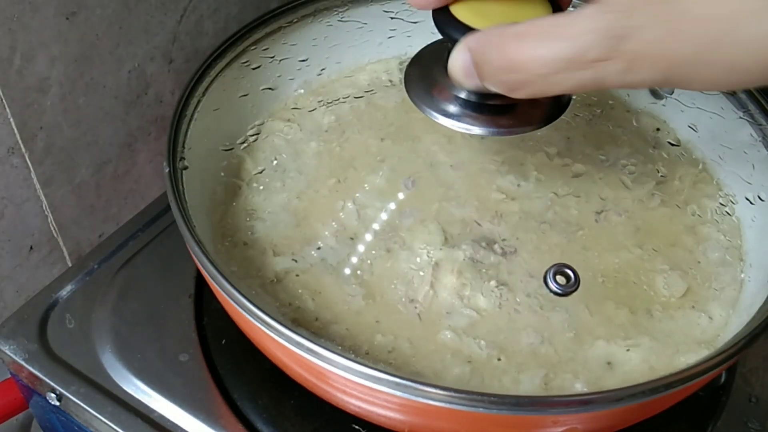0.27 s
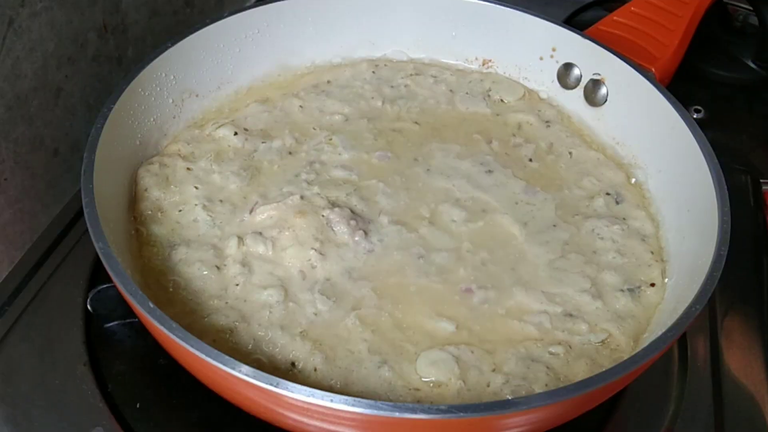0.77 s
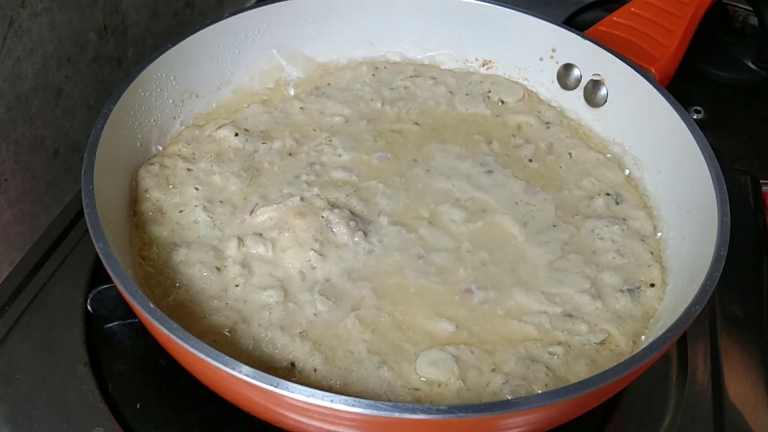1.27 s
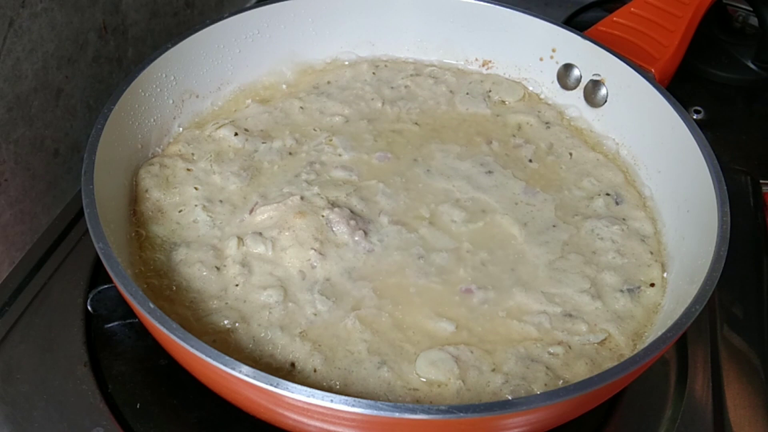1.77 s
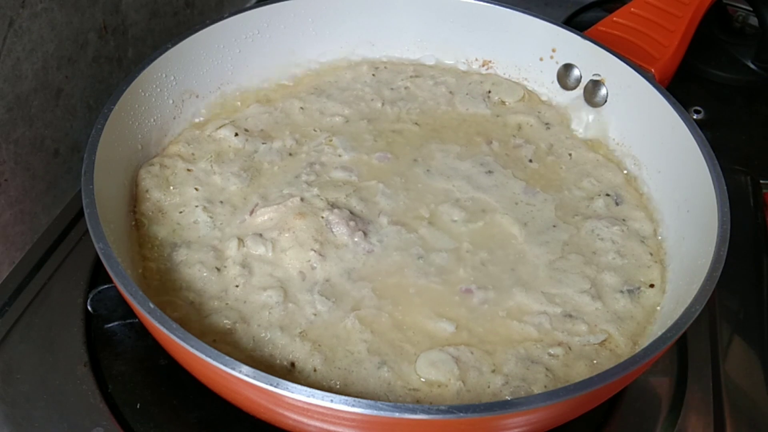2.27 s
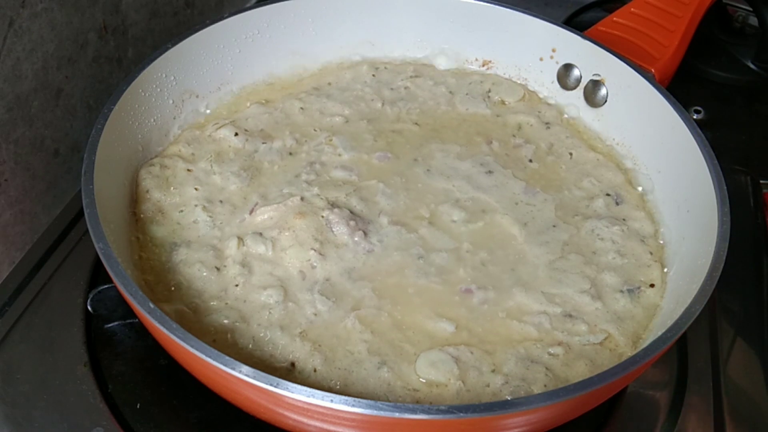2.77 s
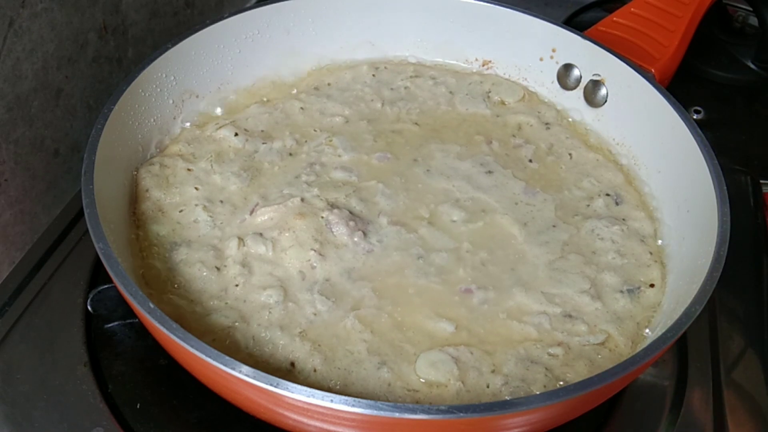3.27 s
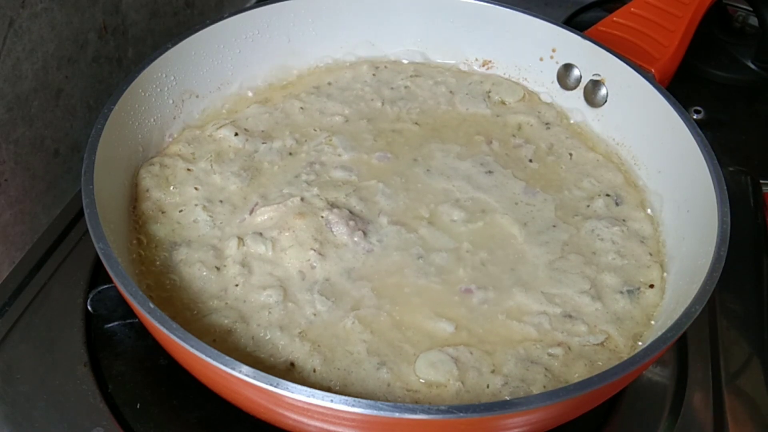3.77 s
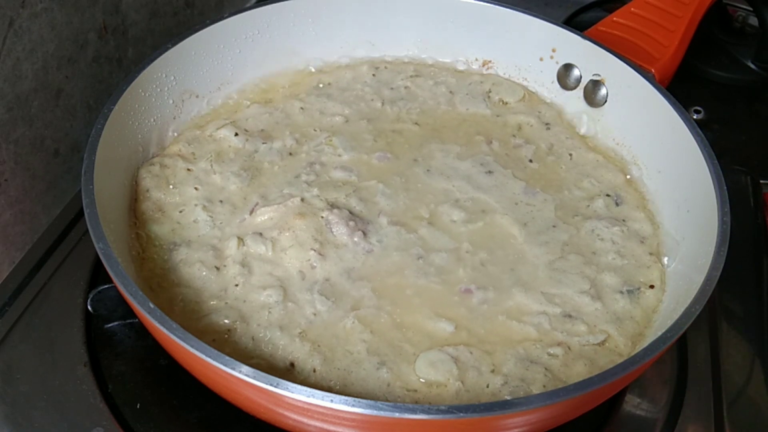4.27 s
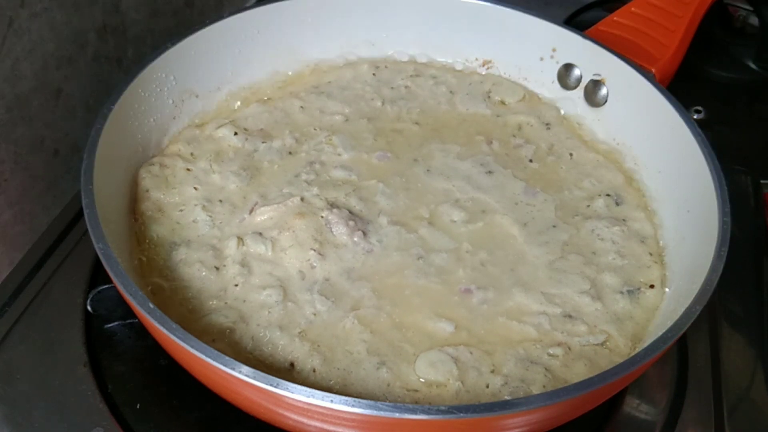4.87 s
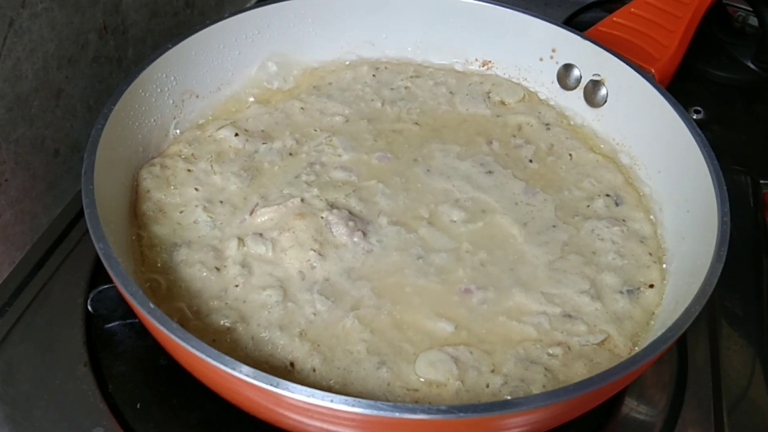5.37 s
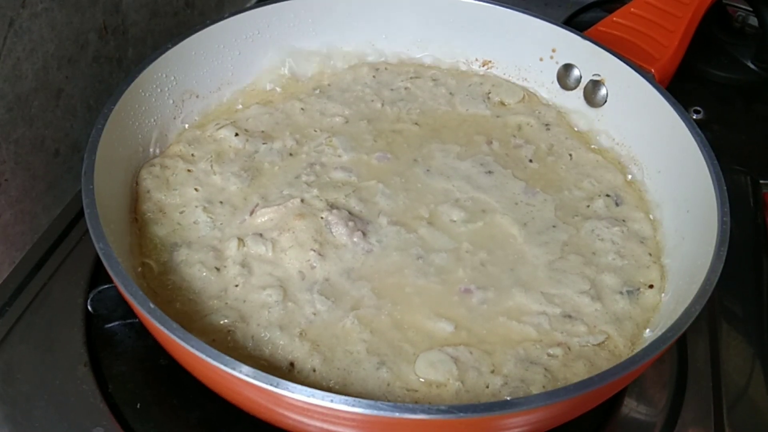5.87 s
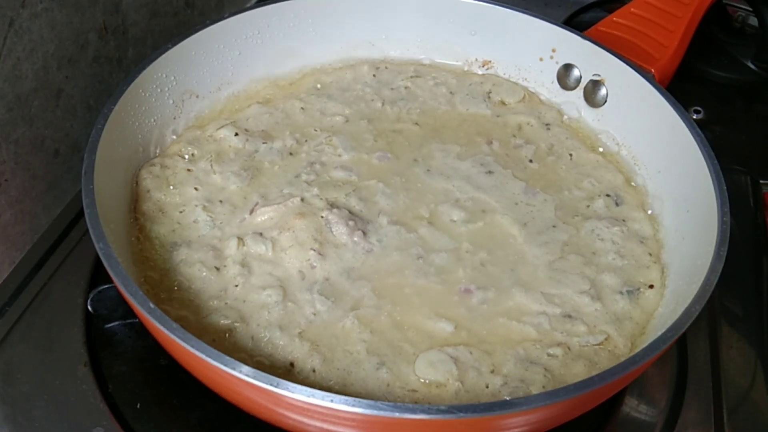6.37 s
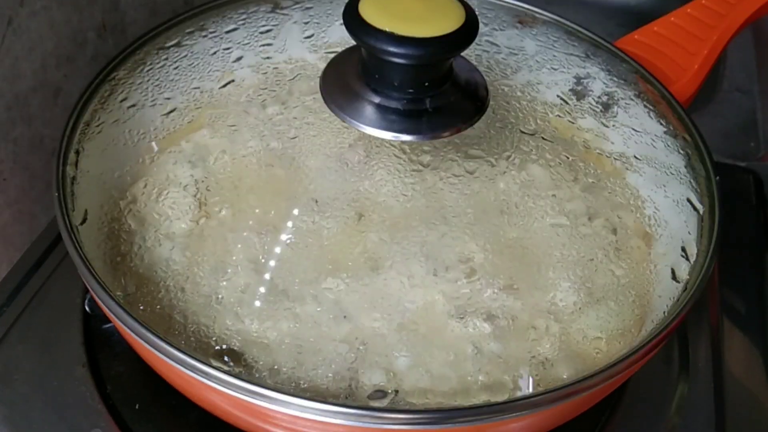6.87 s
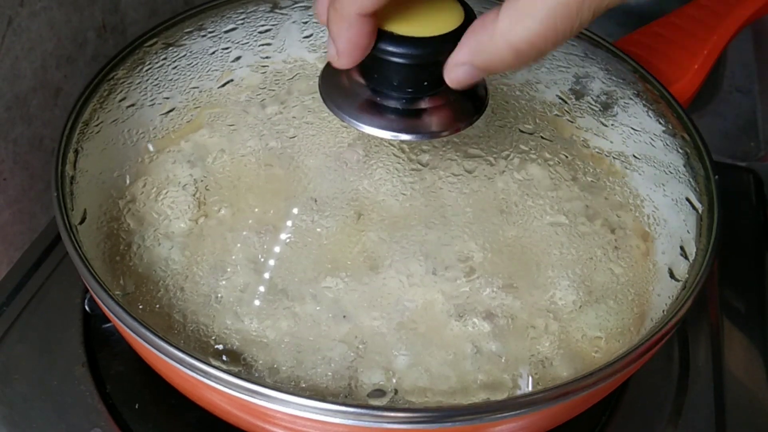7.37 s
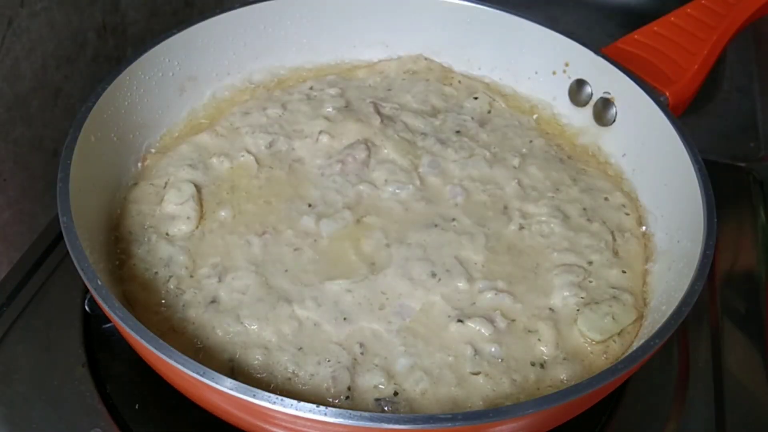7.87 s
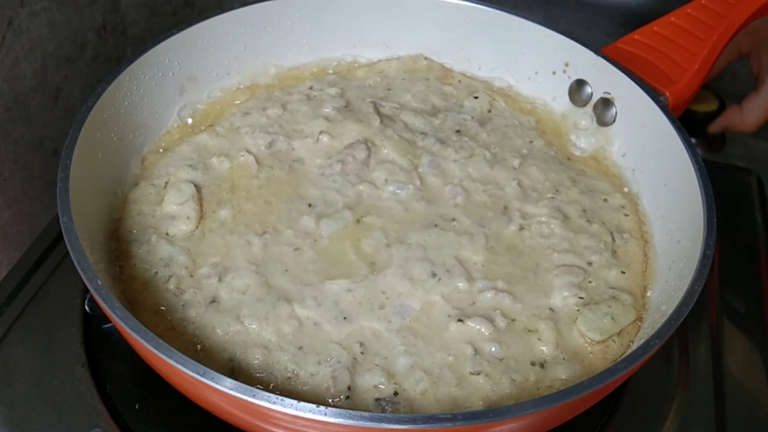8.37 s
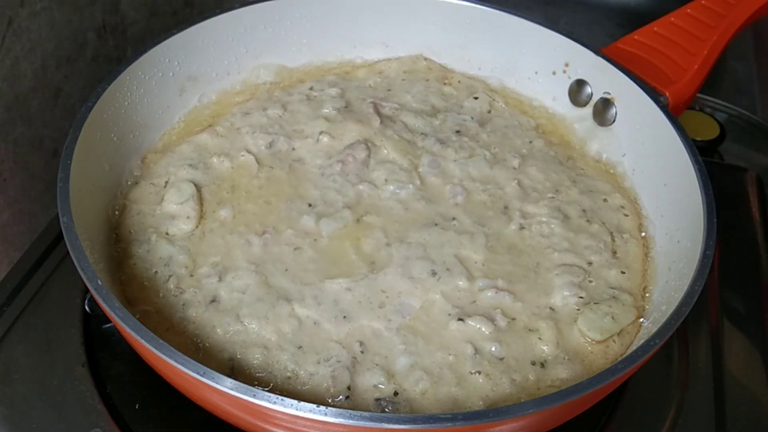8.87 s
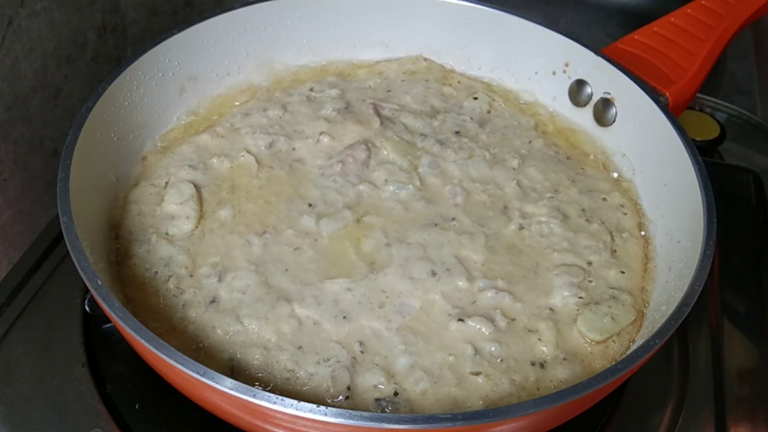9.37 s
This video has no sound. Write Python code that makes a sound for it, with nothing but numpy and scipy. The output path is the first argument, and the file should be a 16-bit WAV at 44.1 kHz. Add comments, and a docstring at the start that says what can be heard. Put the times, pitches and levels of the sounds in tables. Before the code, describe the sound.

Close in a small kitchen, batter fries faintly and hollowly beneath a glass lid, then cuts abruptly to bright open sizzling with irregular ringing pops. A motorbike pulls away outside, changing gear under the frying. Another cut brings quiet, ticking covered bubbling. The lid lifts, sizzling returns, and dull bumps and ringing clacks mark its landing on the steel stove. One sharp oil spit stands out near the end.

```python
"""First comes faint, hollow ticking: batter frying in a shallow pan under a glass lid, in a small kitchen.
The scene jumps to the open pan, all sizzle and pops, made of many short ringing bubbles, while a motorbike
passes outside, made of exhaust tones, rumble and tyre noise. After another jump the pan is covered again.
The lid comes off and is put down on the steel stove top, with dull bumps and ringing clacks; a few sharp
cracks of spitting oil, clicks with quick reflections, stand out of the sizzle."""
import sys
import numpy as np
from scipy import signal
from scipy.fft import rfft, irfft
from scipy.io import wavfile
from scipy.ndimage import uniform_filter1d, map_coordinates

SR = 44100
rng = np.random.default_rng(int(sys.argv[2]) if len(sys.argv) > 2 else 0)


def dump(signal):
    """Clip the signal to [-1, 1] and save it as 16-bit WAV at the path in sys.argv[1]."""
    limited = np.clip(np.atleast_2d(signal).T, -1, 1)
    pcm = np.round(limited * 32767).astype(np.int16)
    wavfile.write(sys.argv[1], SR, pcm)


N = 424237
TIME = np.arange(N) / SR

# A "trim" in a function is added to the level in the table.
# Colours list (frequency [Hz], level [dB per Hz]); only their shape counts, not their overall level.
# The still kitchen: its colour
STILL_COLOUR = [(25, 4.5), (60, 2), (120, 10.5), (250, 2.5), (500, -8), (1000, -9), (3000, -24),
                (15000, -30)]
# Sizzle that leaks past the lid: (time [s], level before trim [dB])
LID_LEAK = [(0, -60.5), (.12, -66), (.21, -62.5), (.33, -69.5), (.42, -65.5), (.5, -66.5), (6.52, -76),
            (6.62, -74), (6.74, -65), (6.8, -82), (6.92, -71.5), (7.05, -73), (7.19, -87), (7.297, -61),
            (7.31, -56)]
# Colour of the space under the lid, held by its knob at first
HELD_LID_COLOUR = [(300, -9), (600, -19), (900, -0.5), (1100, -20), (1550, -10), (2020, -31), (2310, -7),
                   (2750, -19), (3260, -1.5), (3560, -30), (3910, -9), (4100, -25), (4370, 0), (4700, -12),
                   (5030, -1), (5500, -6), (5720, -20), (6290, 0), (6650, -8), (7420, -1), (7870, -2.5),
                   (8200, -5), (8730, -1), (8950, -9), (9240, -6), (11000, -22), (16000, -33)]
# Colour of the space under the lid, later seated tight
SEATED_LID_COLOUR = [(600, -29), (1000, -8), (1600, -42), (2400, -26), (3500, -16), (3880, -19), (4350, -6),
                     (4700, -10), (5050, -0.5), (5650, -30), (6000, -13), (6300, -2), (6850, -26),
                     (7300, -15), (7950, -7), (8250, -11), (8530, 3), (8950, -11), (9850, -10),
                     (10450, -30), (11800, -23), (16000, -45)]
# Bubbles bursting under the lid and touches on its rim:
# (time [s], peak [dB], pitch [Hz], breadth [frequency ratio])
LID_TICKS = [(0.135, -48, 10900, 1.35), (.1853, -46, 9900, 1.9), (0.366, -51, 6250, 1.34),
             (6.567, -53.5, 7200, 1.2), (6.612, -53, 5450, 4.4), (6.638, -46.5, 7550, 0.9),
             (6.655, -47, 4400, 1.45), (6.686, -45, 7850, 1.6), (6.706, -38, 5330, 1.33),
             (6.722, -44, 7500, 1.7), (6.742, -55, 7450, 2.1), (6.814, -56, 4820, 1.3),
             (6.821, -42, 5680, 1.25), (6.843, -59, 7200, 0.92), (6.8895, -54, 5400, 1.3),
             (6.908, -59, 8500, 1.4), (6.959, -50, 6700, 1.15), (7.011, -55, 5270, 0.81),
             (7.05, -59, 7000, 2.5), (7.12, -63, 8600, 1.2), (7.2228, -41, 3830, 2),
             (7.3041, -48.5, 6290, 1.24)]
# Ringing tones (modes) of the covered pan: (frequency [Hz], level before trim [dB], time to fall 60 dB [s])
LID_MODES = [(3300, -16.5, 0.082), (4400, -5, 0.079), (4970, -2, 0.07), (5300, -3, 0.037),
             (6120, -10, 0.035), (6280, -7, 0.07), (7460, -2, 0.053), (7700, -1, 0.067), (8160, -3, 0.087),
             (8450, -1, 0.081), (8480, -2, 0.062), (9400, -9, 0.06)]
# Slow bubbling in the batter: its colour
BLUBBER_COLOUR = [(250, -18.5), (400, -21), (580, 8), (800, -18), (1080, 2), (1350, -3), (1600, 1),
                  (2400, 6), (3500, -2)]
# Dull bumps of the lid and the stove top:
# (time [s], peak of the boom [dB], peak of the knock [dB], time for the boom to fall 60 dB [s])
LID_BUMPS = [(0, -53, -55, 0.16), (7.25, -57, -81, 0.25), (7.275, -58, -77, 0.27), (8.229, -48, -40, 0.23),
             (8.238, -29.5, -34, 0.29), (8.273, -31, -35, 0.12), (8.289, -42, -35.5, 0.12),
             (8.318, -36, -42, 0.16), (8.361, -36, -37, 0.29), (8.446, -43, -34.5, 0.17),
             (8.466, -41, -44, 0.33), (8.512, -42.5, -44, 0.26)]
# Bumps: their colour
THUD_COLOUR = [(18, -40), (33, -23), (57, 1), (75, -2), (100, 0.5), (132, 3), (175, -2.5), (250, -11),
               (389, -10), (520, -20.5), (721, -11), (1000, -21.5), (1700, -23.5), (3000, -30.5),
               (3900, -29), (6600, -120)]
# Ringing tones of the steel stove top: (frequency [Hz], level before trim [dB], time to fall 60 dB [s])
STOVE_MODES = [(613, -2, .25), (670, 2, 0.12), (723, -4, 0.69), (845, 2, 0.19), (1060, -12, .25),
               (1290, 5, 0.23), (1493, 12, 0.18), (1760, 3.5, 0.28), (1800, 5, .12), (2180, -7, .15),
               (2527, 8, 0.14), (3500, -7, .1)]
# Soft low plops, and short hums as the lid is lifted: (time [s], peak [dB], pitch [Hz])
SOFT_PLOPS = [(.07, -61, 398), (.2, -71, 1580), (0.221, -60, 890), (.28, -61.5, 390), (.368, -70, 1760),
              (.39, -69, 1480), (.44, -65, 1240), (.472, -61, 380), (6.87, -68, 3300), (6.985, -68, 2790),
              (6.99, -68, 1080), (7.045, -65, 995), (7.1, -67, 1950), (7.31, -63, 427), (7.325, -83, 950),
              (7.495, -56, 583), (7.625, -73, 570), (7.815, -57, 594), (7.875, -68, 887)]
# Vigour of the frying: (time [s], fine fizz before trim [dB], coarse crackle before trim [dB])
FRYING_VIGOUR = [(.5, -54.5, -57), (1.5, -55.5, -59), (2.4, -54.5, -58.5), (2.68, -52.5, -56.5),
                 (2.9, -56.5, -59), (4.4, -55.5, -58.5), (5.8, -55, -57), (6.3, -54.5, -59.5),
                 (7.3, -53, -64), (7.45, -56.5, -59.5), (7.8, -55.5, -53.5), (8.1, -53.5, -60),
                 (8.45, -55, -56), (9.6, -54.5, -55)]
# Sizzle: its colour
SIZZLE_COLOUR = [(50, -34), (110, -12), (300, -32), (700, -30), (1200, -37), (1800, -23.5), (2500, -2.5),
                 (3500, -1), (5000, 2), (6500, 4), (7700, 8.5), (8700, 4), (10000, -4), (12000, -11),
                 (14000, -18.5), (16000, -19.5)]
# Rumble of the motorbike: (time [s], deep part before trim [dB], droning part before trim [dB])
RUMBLE_LEVELS = [(0.5, -68, -62), (0.73, -72, -65.5), (1.57, -70, -49), (2.05, -49, -55), (2.19, -53, -57),
                 (2.59, -59, -52), (3.17, -57.5, -55.5), (3.29, -79, -52.5), (4.18, -67, -47),
                 (4.63, -97, -61), (4.89, -64, -51), (5.01, -82, -55), (5.41, -51, -49), (5.58, -61, -56),
                 (5.75, -46, -59), (5.96, -70, -51.5), (6.4, -66, -58), (6.5, -80.5, -55)]
# Rumble: its colour
RUMBLE_COLOUR = [(21, -48), (35, -28), (55, -11.5), (72, -2.5), (92, -8), (118, 1), (145, -7), (175, 2.5),
                 (200, 0.5), (231, 2), (255, -1), (279, -23), (300, -11), (390, -34.5), (660, -60)]
# Motorbike pulling away, changing gear and opening the throttle in bursts:
# (time [s], firing rate before roughness [firings per s], level before trim [dB])
ENGINE_COURSE = [(1.0, 49.5, -80), (1.27, 54, -54.5), (1.37, 62, -53), (1.6, 64.2, -44), (1.95, 66, -46.5),
                 (2.25, 69.7, -51), (2.65, 72, -48), (3.19, 71, -53), (3.25, 51, -52), (3.55, 51.5, -50),
                 (3.8, 53, -41), (3.9, 55.4, -49.5), (4.1, 55, -48.5), (4.35, 54.3, -51.5),
                 (4.66, 52.7, -60), (4.81, 54.4, -44), (5.08, 55, -59), (5.33, 55.6, -45),
                 (5.56, 59.5, -59), (5.64, 73, -65), (5.78, 76, -49.5), (5.88, 52.6, -64), (6.0, 53, -48.5),
                 (6.15, 56.5, -52), (6.3, 55.5, -70), (6.5, 57.5, -57)]
# Exhaust harmonics, from the first up: (level before wavering [dB])
EXHAUST_HARMONICS = [-2.5, 0, 0, -4.5, -25.5, -29, -6.5]
# Resonances of the house, which a harmonic swells in as it glides through:
# (centre [Hz], half width [Hz], level [dB])
HOUSE_RESONANCES = [(72.8, 7.4, -4.5), (123.8, 11.7, 0.5), (178, 16.7, -1), (222.4, 14, -4),
                    (369.5, 11.6, -2.5)]
# Tyre noise as it nears and leaves:
# (time [s], dull roar before trim and flutter [dB], bright rush before flutter [dB])
TYRE_LEVELS = [(.5, -88, -88), (1.0, -75, -78), (1.25, -68, -83), (1.55, -62, -64), (1.8, -56.5, -67.5),
               (2.2, -57, -67), (2.9, -59, -65.5), (3.3, -56.5, -61), (3.75, -54.5, -64), (4.3, -53.5, -54),
               (4.75, -51.5, -56), (5.1, -51.5, -59), (5.4, -51, -64), (5.8, -58, -67), (6.15, -63.5, -71),
               (6.35, -70, -74), (6.5, -62, -61)]
# Dull roar of the tyres: its colour
ROAD_COLOUR = [(40, -52.5), (200, -20.5), (280, -7.5), (310, -3.5), (335, -7), (370, 1.5), (410, -1.5),
               (445, -7.5), (500, -4), (555, -2.5), (620, -10.5), (720, -8), (850, -19), (1300, -41),
               (5000, -58.5)]
# Bright rush of the tyres: its colour
RUSH_COLOUR = [(250, -15), (450, 6.5), (620, 5.5), (750, 8.5), (860, 2), (980, -3.5), (1122, 4), (1190, -5),
               (1264, 6.5), (1450, 0), (1630, 6.5), (1900, -0.5), (2250, 3.5), (3000, -2.5), (5000, -27)]
# Short ragged spurts of noise, splutters in the pan and handling of the lid:
# (time [s], peak [dB], pitch [Hz], time for the noise to fall 60 dB [s])
NOISE_SPURTS = [(0.506, -51, 1660, 0.74), (0.582, -37, 1560, 0.062), (.885, -47.5, 1290, 0.15),
                (1.021, -45, 1660, 0.062), (2.205, -59, 1430, 0.071), (2.604, -42.5, 1570, 0.16),
                (3.876, -48.5, 1715, 0.86), (4.755, -41, 2000, 0.048), (5.897, -46.5, 1650, 0.2),
                (6.285, -47.5, 1690, 0.21), (7.498, -59.5, 784, 0.17), (7.813, -59.5, 735, 0.67),
                (7.887, -39.5, 1860, 0.17), (9.301, -51, 1360, 0.21)]
# Single bubbles bursting in the open pan, loud and soft:
# (time before delay [s], peak before trim [dB], pitch [Hz], length of the ring [cycles])
SINGLE_POPS = [(0.566, -34.5, 6160, 18), (0.581, -29, 4620, 23), (0.67, -33, 6740, 22),
               (0.8838, -45, 2610, 16), (0.9292, -34, 8400, 31), (0.954, -36, 4960, 11),
               (1.067, -28.5, 8700, 30), (1.315, -36, 5640, 23), (1.342, -38, 6030, 39),
               (1.4848, -39.5, 3020, 10), (1.793, -31, 7810, 16), (1.852, -34.5, 4540, 8.1),
               (2.0007, -42, 2302, 16), (2.2052, -31.5, 2760, 8.3), (2.2486, -35, 5000, 14),
               (2.367, -35.5, 6540, 23), (2.512, -34.5, 4534, 7.5), (2.5563, -29, 8050, 6.3),
               (2.604, -28, 2780, 15), (2.8237, -19.5, 7165, 8.3), (2.9006, -37.5, 5700, 22.3),
               (3.0718, -22.5, 5420, 7.2), (3.2353, -40.5, 3080, 8.1), (3.1626, -41.5, 2410, 18),
               (3.196, -30, 3180, 8), (3.4017, -37, 3146, 4.6), (3.6265, -28, 6900, 6.4),
               (3.877, -29, 3100, 15), (3.9705, -26, 4600, 8.4), (4.3235, -30, 9000, 10),
               (4.354, -30.5, 2280, 8.9), (4.8545, -30.5, 4500, 8.8), (5.108, -38.5, 2630, 10.6),
               (5.252, -38, 2690, 16), (5.2688, -30.5, 3080, 8.6), (5.5614, -36, 4910, 7.8),
               (5.6573, -29.5, 3830, 8.5), (5.7409, -31.5, 5950, 5), (5.896, -32, 4696, 12),
               (5.968, -41, 4493, 5), (6.08, -27.5, 7250, 40), (6.335, -21.5, 5240, 28),
               (6.441, -34, 4840, 22), (6.4545, -35, 5470, 11), (6.485, -39, 4200, 9.3),
               (7.431, -44, 7000, 4.4), (7.442, -47, 3600, 24), (7.7, -26, 3030, 11),
               (7.817, -26, 9100, 11), (7.981, -24.5, 7500, 7.3), (8.179, -43, 2620, 19),
               (8.593, -38, 4670, 28), (9.2144, -30.5, 2530, 4.1), (9.447, -44, 3000, 26)]
# Oil spitting: (time [s], peak [dB])
OIL_SPITS = [(3.0715, -26.5), (7.8178, -34), (9.162, -10)]
# Oil spitting: its colour
SPIT_COLOUR = [(180, -41), (300, -25.5), (500, -11.5), (700, -12), (1120, -30), (1280, -15), (2030, -16.5),
               (3400, -3.5), (3950, -13), (6960, 0.5), (13300, -18), (16000, -29)]
# Lid clacking on the stove: (time [s], peak [dB])
LID_CLACKS = [(8.2385, -45), (8.276, -31.5), (8.292, -51), (8.364, -46), (8.4245, -33), (8.446, -31),
              (8.456, -41), (8.529, -34.5), (8.597, -41), (8.8694, -23.5), (9.5075, -24), (9.519, -31),
              (9.586, -35), (9.61, -44)]
# Lid clacks: their colour
CLACK_COLOUR = [(210, -66), (350, -34), (436, -20.5), (677, 2.5), (1400, -6), (2580, 6.5), (3110, 2),
                (3420, 6.5), (3700, -5), (4130, 5), (6940, 1), (8000, 3.5), (15000, -29)]

OPEN_FROM_S, OPEN_UNTIL_S = 0.499, 6.523  # the scene jumps to the open pan, then to the covered pan again
LIFT_S, LIFT_TAKES_S = 7.292, 0.12  # the lid is lifted off
STILL_DB = -77.5
PLOP_T60_S, KITCHEN_T60_S = 0.067, 0.35  # times to fall 60 dB
POP_DELAY_S = .0008  # each single pop starts this long after its listed time
SMALL_POPS_PER_S, SMALL_POP_DB, SMALL_POP_SPREAD_DB = 9, -37, 2.5
SMALL_POP_LOW_HZ, SMALL_POP_HIGH_HZ, SMALL_POP_CYCLES = 3300, 8500, 8.5
CUTOFF_HZ = 15900


def amp(db):
    """Turn decibels into gain."""
    return np.exp(np.asarray(db) * (np.log(10) / 20))


def rms_one(x):
    """Scale a sound to an average (rms) strength of 1."""
    return x / np.sqrt(np.mean(x ** 2) + 1e-20)


def peak_one(x):
    """Scale a sound so that its highest peak is 1."""
    return x / np.abs(x).max()


def in_time(rows):
    """Draw each column of a table as a curve with a value at every sample."""
    times, *columns = np.transpose(rows)
    return [np.interp(TIME, times, column) for column in columns]


def cut(x, hz, kind, order=4):
    """Keep only part of the pitch range with a Butterworth filter."""
    sos = signal.butter(order, np.minimum(hz, .45 * SR), kind, fs=SR, output="sos")
    return signal.sosfilt(sos, x + 1e-18)


def convolve(x, response):
    """Pass a sound through an impulse response."""
    return signal.oaconvolve(np.float32(x), np.float32(response))[:len(x)].astype(float)


def colour(x, spectrum, size=8192):
    """Give a sound a spectrum with a filter of unit energy that acts as early as it can (minimum phase)."""
    hz, db = np.transpose(spectrum)
    grid = np.maximum(np.arange(size // 2 + 1) * SR / size, 1)
    gains = amp(np.interp(np.log(grid), np.log(hz), db))
    # fold the cepstrum forward in time, so that nothing sounds before its cause
    cepstrum = irfft(np.log(gains))
    cepstrum[1:size // 2] *= 2
    cepstrum[size // 2 + 1:] = 0
    response = irfft(np.exp(rfft(cepstrum)))
    return convolve(x, response / np.linalg.norm(response))


def drift(rate):
    """Wander by chance with spread 1, taking a new direction `rate` times a second."""
    knots = rng.standard_normal(4000)
    return rms_one(np.interp(TIME * rate, np.arange(len(knots)), knots))


def flicker(x, depth_db, width_hz, span_s, size=512):
    """Let patches of the given pitch width and length swell and fade by chance; rms 1."""
    hz, s, cells = signal.stft(x, SR, nperseg=size)
    knots = rng.standard_normal((300, 600))
    places = np.meshgrid(hz / width_hz, s / span_s, indexing="ij")
    patches = map_coordinates(knots, places, order=1, mode="wrap")
    return rms_one(signal.istft(cells * amp(depth_db * patches), SR, nperseg=size)[1][:N])


def ring(clicks, hz, t60):
    """Let each unit click set off a sine that starts near height 1 and falls 60 dB in t60 seconds."""
    decay, turn = amp(-60 / (t60 * SR)), 2 * np.pi * hz / SR
    return signal.lfilter([0, np.sin(turn)], [1, -2 * decay * np.cos(turn), decay * decay], clicks + 1e-18)


def ring_modes(x, modes):
    """Let a sound set a piece of cookware ringing at its own pitches."""
    return sum(amp(db) * ring(x, hz, t60) for hz, db, t60 in modes)


def dying_noise(t60, size=16384):
    """Dense reflections dying away, with unit energy."""
    tail = rng.standard_normal(size) * amp(-60 * TIME[:size] / t60)
    return tail / np.linalg.norm(tail)


def impulse(size=16384):
    """A single click."""
    return signal.unit_impulse(size)


def add(out, s, sound):
    """Mix a sound in at time s."""
    i = max(round(s * SR), 0)
    out[i:i + len(sound)] += sound[:max(N - i, 0)]


def pan_walls(scatter_db, scatter_t60, near_s=0.00098, echo=0.11):
    """Path from one spot in the pan: direct sound, two echoes off the wall, scatter from stove and tiles."""
    path = impulse() + amp(scatter_db) * dying_noise(scatter_t60)
    for lag_s in near_s * np.array([1, 2]) * rng.uniform(.75, 1.25, 2):
        path[int(lag_s * SR)] += echo
    return path


def burst(path, hz, cycles, reach=1.7):
    """A short burst rings for a few cycles, with little sound far from its pitch."""
    edge = max(reach, 1.1)
    ringing = ring(path, hz, max(cycles, 2) / hz)
    return cut(ringing, [hz / edge, hz * edge], "band", order=2)


def random_clicks(born, spread_db, cap):
    """Clicks of uneven strength, up or down by chance; strong ones are rare and capped."""
    strength = amp(spread_db * np.minimum(rng.exponential(1, N), cap))
    return born * strength * rng.choice([-1, 1], N)


def grains(per_s, spread_db, cycles, low_hz, high_hz, scatter_db, scatter_t60, patchy_db, count, size=4096):
    """Uneven steam bubbles burst in clumps; each pitch has its own lively or calm spot; even power per Hz."""
    out, dealt = 0, rng.integers(0, count, N)
    born = rng.random(N) < per_s * amp(3 * drift(22)) / SR
    clicks = random_clicks(born, spread_db, cap=4.5)
    for k, hz in enumerate(np.geomspace(low_hz, high_hz, count)):
        bubble = burst(pan_walls(scatter_db, scatter_t60)[:size], hz, cycles)
        spot = clicks * (dealt == k) * amp(patchy_db * drift(9))
        out = out + np.sqrt(hz) * rms_one(convolve(spot, bubble))
    return rms_one(out)


def still_kitchen():
    """The quiet room is steady coloured noise."""
    return amp(STILL_DB) * rms_one(colour(rng.standard_normal(N), STILL_COLOUR))


def lid_leak(openness, trim_db=-1, per_s=350, hiss_db=-8, ring_db=-5):
    """Under the lid the frying is faint and hollow, as many small bursts ring between glass and metal."""
    clicks = random_clicks(rng.random(N) < per_s / SR, spread_db=4.5, cap=4)
    bursts = rms_one(convolve(clicks, dying_noise(t60=0.14))) + amp(hiss_db) * rng.standard_normal(N)
    bursts = flicker(bursts, depth_db=8, width_hz=413, span_s=0.035)
    ringing = amp(ring_db) * rms_one(ring_modes(bursts, LID_MODES))
    seated = rms_one(colour(bursts + ringing, SEATED_LID_COLOUR))
    held = rms_one(colour(bursts, HELD_LID_COLOUR))
    leak = np.where(TIME < OPEN_UNTIL_S, held, seated)
    return (1 - openness) * amp(in_time(LID_LEAK)[0] + trim_db) * leak


def lid_ticks(tick_t60=0.077, ring_db=-9, echo_db=-12, echo_t60=0.31):
    """Single bursts and touches on the rim tick, echo and make the covered pan ring."""
    out = np.zeros(N)
    for s, db, hz, breadth in LID_TICKS:
        echoes = dying_noise(tick_t60) + amp(echo_db) * dying_noise(echo_t60)
        tick = rms_one(burst(echoes, hz, 1.7 / max(breadth - 1, .05), reach=breadth))
        # each tick excites the ringing tones in its own random mix
        ringing = sum(amp(4.6 * rng.standard_normal()) * ring_modes(tick, [mode]) for mode in LID_MODES)
        lid_colour = HELD_LID_COLOUR if s < OPEN_UNTIL_S else SEATED_LID_COLOUR
        tick = colour(tick + amp(ring_db) * rms_one(ringing), lid_colour)
        add(out, s, amp(db) * peak_one(tick))
    return out


def bubbling(openness, level_db=-68.0, lid_early_db=-10, lid_late_db=-20):
    """Bigger, slower bubbles blurt through the thick batter; the lid shuts most of them in."""
    blurts = grains(per_s=150, spread_db=3.0, cycles=76, low_hz=417.0, high_hz=3010,
                    scatter_db=9, scatter_t60=0.093, patchy_db=5.0, count=22)
    lid_gain = amp(np.where(TIME < OPEN_UNTIL_S, lid_early_db, lid_late_db))
    through = openness + (1 - openness) * lid_gain
    return amp(level_db) * through * rms_one(colour(blurts, BLUBBER_COLOUR))


def bumps(knock_hz=300, rattle_db=3, knock_share=0.93, ring_db=-58):
    """Each bump is a low boom and a shorter, hollow knock, and sets the steel ringing."""
    out = np.zeros(N)
    for s, boom_db, knock_db, t60 in LID_BUMPS:
        boom = colour(impulse() + amp(rattle_db) * dying_noise(t60), THUD_COLOUR)
        boom = cut(boom, knock_hz, "low", order=3)
        knock = colour(impulse() + amp(rattle_db + 5.5) * dying_noise(t60 * knock_share), THUD_COLOUR)
        knock = cut(knock, knock_hz, "high", order=3)
        add(out, s, amp(boom_db) * peak_one(boom) + amp(knock_db) * peak_one(knock))
    return out + amp(ring_db) * ring_modes(out, STOVE_MODES)


def plops():
    """Soft low plops, and short hums as the lid is lifted: dying noise rings briefly at one pitch."""
    out = np.zeros(N)
    for s, db, hz in SOFT_PLOPS:
        plop = ring(dying_noise(PLOP_T60_S), hz, PLOP_T60_S)
        add(out, s, amp(db) * peak_one(plop))
    return out


def sizzle(fizz_trim_db=1.5, crackle_trim_db=1.5, hiss_db=-4):
    """Countless bursts merge to a fine fizz above 6000 Hz and a flickering, coarse crackle below."""
    fine_db, coarse_db = in_time(FRYING_VIGOUR)
    bursts = grains(per_s=3000, spread_db=4.0, cycles=8.9, low_hz=1544, high_hz=15700,
                    scatter_db=4.5, scatter_t60=0.048, patchy_db=0.95, count=14)
    frying = colour(bursts + amp(hiss_db) * rng.standard_normal(N), SIZZLE_COLOUR)
    fine = rms_one(cut(frying, 6000, "high", order=5))
    coarse = cut(frying, 6000, "low", order=5)
    coarse = flicker(coarse, depth_db=2.0, width_hz=348, span_s=0.07)
    return amp(fine_db + fizz_trim_db) * fine + amp(coarse_db + crackle_trim_db) * coarse


def house_gain(hz, between_db=-33):
    """How strongly a tone from the street comes through the house at this pitch."""
    swells = sum(amp(db) * np.exp(-((hz - centre) / width) ** 2) for centre, width, db in HOUSE_RESONANCES)
    return amp(between_db) + swells


def exhaust(trim_db=-1, rough=0.01484, waver_db=3.0):
    """Each firing adds a cycle to the exhaust tone, whose harmonics swell in the house's resonances."""
    firing, engine_db = in_time(ENGINE_COURSE)
    phase = 2 * np.pi * np.cumsum(firing * (1 + rough * drift(30))) / SR
    tones = 0
    for k, db in enumerate(EXHAUST_HARMONICS, 1):
        gain = amp(db + waver_db * drift(14)) * house_gain(k * firing)
        tones = tones + gain * np.sqrt(2) * np.sin(k * phase)
    return amp(engine_db + trim_db) * tones


def engine_rumble(deep_trim_db=-3.0, drone_trim_db=-3.5, gust_db=0.5):
    """Low noise that comes in gusts, split at 90 Hz into a deep part and a drone."""
    rumble = amp(gust_db * drift(11)) * colour(rng.standard_normal(N), RUMBLE_COLOUR)
    deep, drone = rms_one(cut(rumble, 90, "low")), rms_one(cut(rumble, 90, "high"))
    deep_db, drone_db = in_time(RUMBLE_LEVELS)
    return amp(deep_db + deep_trim_db) * deep + amp(drone_db + drone_trim_db) * drone


def tyres(roar_trim_db=-3, flutter_db=1.63):
    """Tyre noise is a dull roar and a bright rush, each fluttering in level."""
    road = convolve(rng.standard_normal(N), impulse() + amp(-6.5) * dying_noise(t60=0.2))  # the room's modes
    road = flicker(road, depth_db=4.5, width_hz=100.9, span_s=0.11, size=2048)
    dull_db, bright_db = in_time(TYRE_LEVELS)
    roar = amp(dull_db + roar_trim_db + flutter_db * drift(17)) * rms_one(colour(road, ROAD_COLOUR))
    rush = amp(bright_db + flutter_db * drift(16)) * rms_one(colour(road, RUSH_COLOUR))
    return roar + rush


def motorbike():
    """A passing motorbike is exhaust tones over rumble and tyre noise that brightens as it passes."""
    return exhaust() + engine_rumble() + tyres()


def spurts():
    """Short ragged spurts of dying noise around one pitch: splutters in the pan and handling of the lid."""
    out = np.zeros(N)
    for s, db, hz, t60 in NOISE_SPURTS:
        spurt = burst(dying_noise(t60), hz, cycles=2, reach=1.47)
        add(out, s, amp(db) * peak_one(spurt))
    return out


def pop(hz, cycles, breadth=12, size=3072):
    """One burst with peak 1; it swells as the bubble opens, and the longer it rings the purer its pitch."""
    path = pan_walls(scatter_db=1.5, scatter_t60=0.028)[:size]
    opening = ring(path, hz, 0.35 * cycles / hz)
    return peak_one(burst(opening, hz, cycles, reach=1 + breadth / cycles))


def pops(trim_db=0.5):
    """Single bubbles, loud and soft, burst in the open pan at listed times."""
    out = np.zeros(N)
    for s, db, hz, cycles in SINGLE_POPS:
        add(out, s + POP_DELAY_S, amp(db + trim_db) * pop(hz, cycles))
    return out


def small_pops(count=120):
    """More bubbles burst at uneven random intervals, each with its own level and pitch."""
    out = np.zeros(N)
    times = np.cumsum(rng.gamma(2, .5, count)) / SMALL_POPS_PER_S
    levels_db = SMALL_POP_DB + SMALL_POP_SPREAD_DB * rng.standard_normal(count)
    pitches_hz = rng.uniform(SMALL_POP_LOW_HZ, SMALL_POP_HIGH_HZ, count)
    for s, db, hz in zip(times, levels_db, pitches_hz):
        add(out, s, amp(db) * pop(hz, SMALL_POP_CYCLES))
    return out


def cracks(rows, spectrum, modes, rattle_db, rattle_t60, ring_db):
    """A hard click, a short rattle of reflections and a faint ring of the cookware."""
    out = np.zeros(N)
    for s, db in rows:
        ringing = sum(amp(ring_db + 2.4 * rng.standard_normal()) * ring_modes(impulse(), [mode])
                      for mode in modes)
        rattle = pan_walls(rattle_db, rattle_t60, near_s=0.00047, echo=0.24)
        add(out, s, amp(db) * peak_one(colour(rattle + ringing, spectrum)))
    return out


def oil_spits():
    """Spitting oil makes sharp cracks with a faint ring at the lid's pitches."""
    return cracks(OIL_SPITS, SPIT_COLOUR, LID_MODES, rattle_db=-0.5, rattle_t60=0.05, ring_db=-39)


def lid_clacks():
    """The lid clacks on the stove top and makes the steel ring faintly."""
    return cracks(LID_CLACKS, CLACK_COLOUR, STOVE_MODES, rattle_db=9.0, rattle_t60=0.058, ring_db=-50)


def scene():
    """Everything sounds from straight ahead; the kitchen adds a short tail to pops, spurts and cracks."""
    # 1 between the jumps, with edges smoothed over 200 samples
    between_jumps = uniform_filter1d(1.0 * ((TIME > OPEN_FROM_S) & (TIME < OPEN_UNTIL_S)), size=200)
    # 0 is covered, 1 is open
    openness = between_jumps + np.clip((TIME - LIFT_S) / LIFT_TAKES_S, 0, 1)
    covered = lid_leak(openness) + lid_ticks()
    popping = pops() + spurts() + openness * small_pops()
    cracking = oil_spits() + lid_clacks()
    kitchen = convolve(amp(-12.0) * popping + amp(-6.0) * cracking, dying_noise(KITCHEN_T60_S))
    pan = covered + bubbling(openness) + plops() + openness * sizzle() + popping + cracking
    sound = still_kitchen() + pan + kitchen + bumps() + between_jumps * motorbike()
    return np.array([sound, sound])


def record(dry):
    """Cut the top steeply, above CUTOFF_HZ."""
    return signal.sosfilt(signal.ellip(10, .1, 70, CUTOFF_HZ, fs=SR, output="sos"), dry)


dry = scene()
out = record(dry)
dump(out)
```